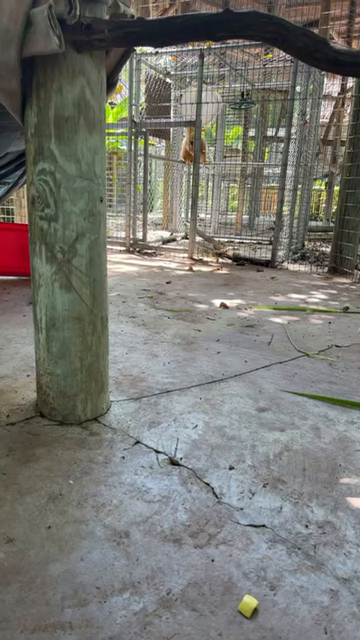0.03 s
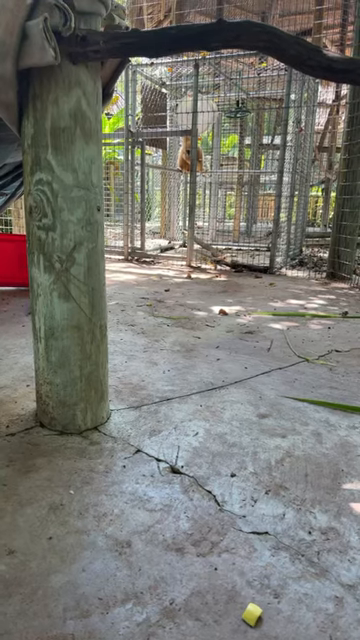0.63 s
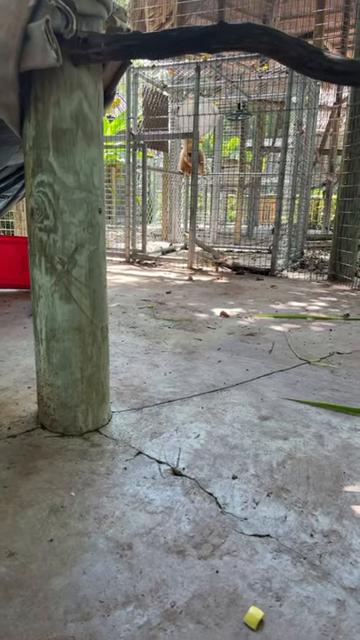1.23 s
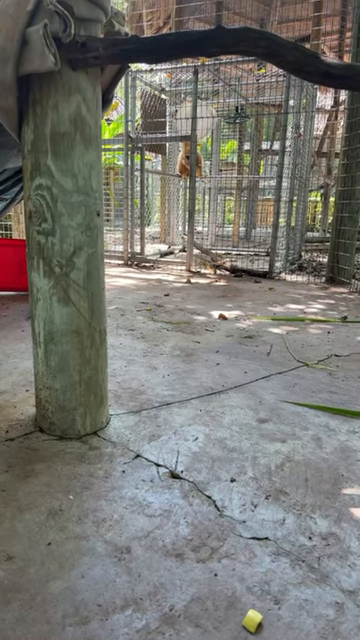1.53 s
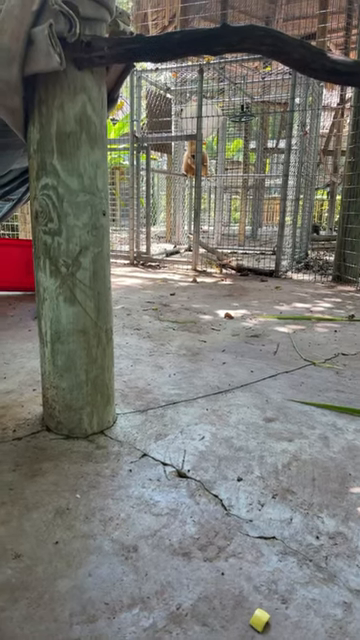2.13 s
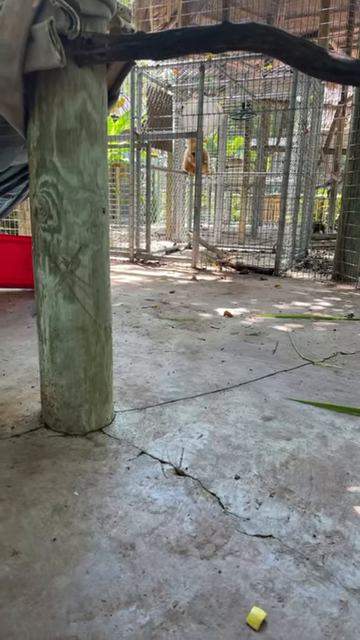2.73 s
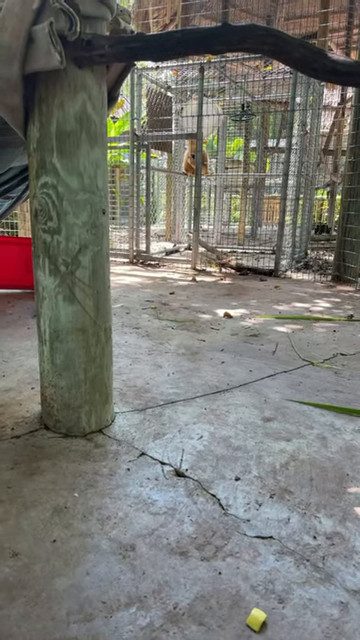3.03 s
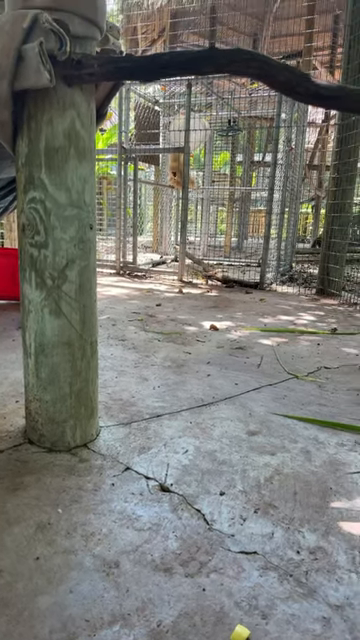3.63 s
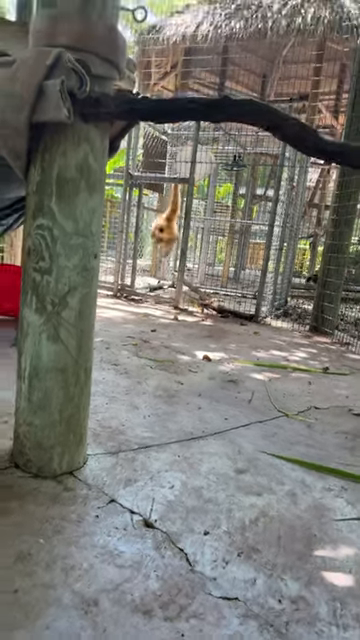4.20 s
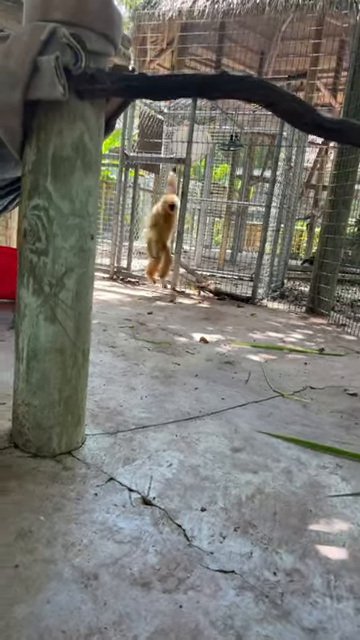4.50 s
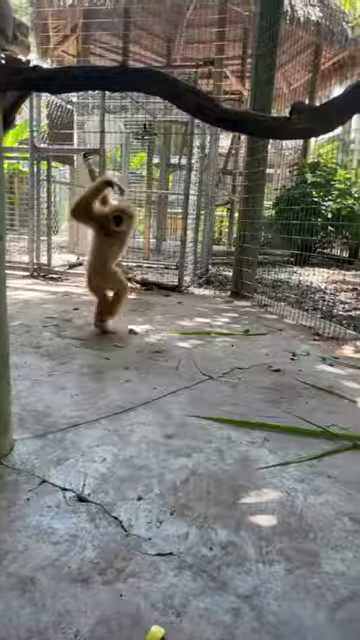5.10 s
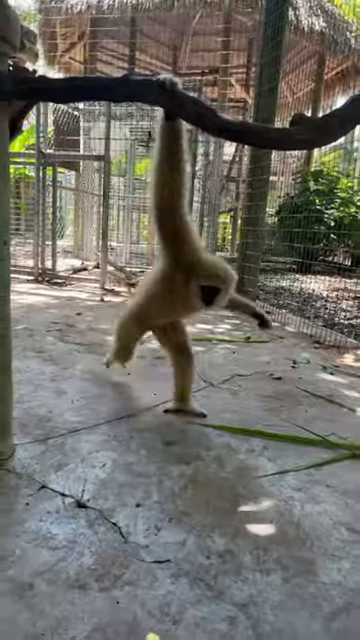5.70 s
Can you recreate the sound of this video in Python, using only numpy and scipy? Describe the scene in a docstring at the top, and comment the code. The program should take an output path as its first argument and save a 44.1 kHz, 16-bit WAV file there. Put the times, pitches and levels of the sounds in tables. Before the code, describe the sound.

A low outdoor rumble and steady hiss run throughout, growing slightly. A far bird gives a faint, falling, echoing whistle at the very start, near 1.9 seconds with a thin high chip, and again at 4.4. Small plops and light knocks dot the quiet, clearest at 0.4 and 3 seconds. From 3.4 a hand rubs the microphone, with a sharp snap at 3.6 and a cluster of close, dull bumps at 3.9. Between 4.1 and 4.7 a gibbon swings off a wire cage: the wires chatter and the frame rings, strongest at about 4.5. At 4.8 it lands on concrete and runs closer in quick, uneven steps, each a gritty slap with a low thud and dull thump. Fine grit crackles and snaps underfoot, getting louder, with a little yard echo. The sharpest footfall comes at about 5.7 seconds.

```python
"""A low outdoor rumble and steady hiss, with a far bird's falling whistle, light knocks and small plops.
A gibbon swings off a wire cage: the wires chatter and the frame rings. It drops to a concrete floor
and runs closer, each footfall a gritty slap, a thud and a thump, over a growing crackle of grit.
Just before the cage rattles, a hand rubs and bumps the camera it holds to follow the animal."""
import sys
import numpy as np
from scipy import signal
from scipy.fft import rfft
from scipy.io import wavfile
from scipy.ndimage import uniform_filter1d

SR = 44100
rng = np.random.default_rng(int(sys.argv[2]) if len(sys.argv) > 2 else 0)


def digitize_waveform(pressure):
    """Quantize a signal to 16-bit integers and store it at the path in sys.argv[1].

    Rows of a 2-D input are taken as channels; values are limited to [-1, 1].
    """
    field = np.atleast_2d(pressure).T
    bounded = np.clip(field, -1, 1)
    quanta = np.round(bounded * 32767).astype(np.int16)
    wavfile.write(sys.argv[1], SR, quanta)


N = 253575
TIME = np.arange(N) / SR


def amp(db):
    """Decibels to gain."""
    return 10 ** (np.asarray(db) / 20)


def unit_rms(x):
    """Scales to rms 1."""
    return x / np.sqrt(np.mean(x ** 2) + 1e-20)


def at_hz(points, hz):
    """Interpolates (f/Hz, value) points on a log-frequency axis."""
    f, value = np.transpose(points)
    return np.interp(np.log(hz + 1), np.log(f + 1), value)


def add(mix, start_s, sound):
    """Mixes a sound in at start_s."""
    at = round(start_s * SR)
    sound = sound[max(-at, 0):]
    part = mix[max(at, 0):][:len(sound)]
    part += sound[:len(part)]


def colour(x, db_at):
    """Filters by a rule Hz -> dB; rms 1."""
    hz = np.fft.rfftfreq(len(x), 1 / SR) + 1
    return unit_rms(np.fft.irfft(rfft(x) * amp(db_at(hz)), len(x)))


def equalise(x, spectrum, tilt_db_oct=0):
    """Filters by a spectrum table and a tilt that levels off below 500 Hz; rms 1."""
    return colour(x, lambda hz: at_hz(spectrum, hz) + tilt_db_oct * np.log2(hz + 500))


def hump(x, centre_hz, width_oct):
    """Rounded band-pass with steep skirts; rms 1."""
    away = lambda hz: (np.log2(hz / centre_hz) / width_oct) ** 2
    return colour(x, lambda hz: -20 * np.log10(1 + away(hz) + (away(hz) / 4) ** 2))


def wander(size, *windows):
    """Noise smoothed by moving averages (lengths in samples); rms 1."""
    x = rng.standard_normal(size)
    for window in windows:
        x = uniform_filter1d(x, size=window)
    return unit_rms(x)


def grit(size, spread_db):
    """Noise of tiny contacts of unequal strength."""
    noise = rng.standard_normal(size)
    strength = rng.standard_normal(size // 16 + 1).clip(-2, 2)
    return noise * amp(spread_db * np.repeat(strength, 16)[:size])


def glide(hz):
    """Sine following a pitch curve."""
    return np.sin(2 * np.pi * np.cumsum(hz) / SR)


def fade(t, rise_s, t60_s):
    """Linear rise, exponential decay."""
    return np.minimum(t / max(rise_s, 1e-5), 1) * amp(-60 * np.maximum(t - rise_s, 0) / t60_s)


def shaped(noise, envelope):
    """Enveloped noise with the envelope's energy."""
    return unit_rms(noise[:len(envelope)] * envelope) * np.sqrt(np.mean(envelope ** 2))


def echoes(x, decay):
    """Scattered reflections dying per band; decay is (f/Hz, t60/s)."""
    taps = rng.standard_normal(SR) * (rng.random(SR) < .1) * (TIME[:SR] > .006)
    hz, t, bands = signal.stft(taps, SR, nperseg=256)
    tail = signal.istft(bands * amp(-60 * t / at_hz(decay, hz)[:, None]), SR, nperseg=256)[1]
    return signal.fftconvolve(x, tail / np.linalg.norm(tail))[:N]


def equal_echoes(x, decay):
    """Echoes at the length and rms of x."""
    return np.std(x) * unit_rms(echoes(x, decay)[:len(x)])


# outdoor noise spectra: f/Hz, relative density/dB
RUMBLE_SPECTRUM = [(20, -17), (36, -21), (54, 0), (70, -3), (105, -3.5), (140, -11), (200, -16.5),
                   (300, -24.5), (480, -35.5), (900, -69)]
DRONE_SPECTRUM = [(60, -31), (155, 2), (220, 1), (280, -7.5), (345, -5), (450, -21.5), (900, -54)]
HISS_SPECTRUM = [(250, -5.5), (450, -0.5), (700, -0.5), (1300, -0.5), (1800, -1.5), (2350, 0.5),
                 (2900, -4.5), (4400, -5), (5200, -2.5), (7500, -5), (9400, -20), (12000, -18),
                 (14000, -22.5), (16000, -43)]
# drone swell: t/s, level/dB
DRONE_LEVELS = [(.1, -56), (.7, -51.5), (1.35, -50.5), (2.3, -57), (4.8, -54.5), (5.3, -59)]
# far machinery: f/Hz, rms level/dB
MACHINE_TONES = [(57, -55), (2326, -80), (3714, -85.5)]


def background(rise_db_s=0.74, hiss_rise_db_s=0.76, waver_hz=2.55):
    """Rumble and hiss grow slowly, a low drone swells and ebbs, far machine tones waver."""
    noise = lambda spectrum: equalise(rng.standard_normal(N), spectrum)
    drift = lambda: wander(N, 4000, 2000)
    rumble = noise(RUMBLE_SPECTRUM) * amp(-47 + rise_db_s * TIME + 1.6 * drift())
    drone = noise(DRONE_SPECTRUM) * amp(np.interp(TIME, *np.transpose(DRONE_LEVELS)))
    hiss = noise(HISS_SPECTRUM) * amp(-60.5 + hiss_rise_db_s * TIME + 0.48 * drift())
    hum = sum(amp(db) * unit_rms(amp(3 * drift()) * glide(hz + waver_hz * drift()))
              for hz, db in MACHINE_TONES)
    return rumble + drone + hiss + hum


# calls: t/s, gain/dB
BIRD_CALLS = [(-.155, -65), (1.866, -61), (4.362, -61)]
# one whistle: t/s, f/Hz, relative level/dB
WHISTLE_CONTOUR = [(0, 3197, -6), (0.054, 3543, -6.5), (.11, 3375, -3), (.195, 3279, -3.5),
                   (.272, 3172, 0.5), (0.314, 2960, -2.5), (0.4, 2743, -10)]
# echo among trees: f/Hz, t60/s
TREE_DECAY = [(1000, 1.3), (6000, 0.74)]


def bird(direct_db=-13, echo_db=-.5, quaver_hz=75):
    """A far, quavering whistle flicks up, holds and sags, smeared by its echoes."""
    times, pitch_hz, db = np.transpose(WHISTLE_CONTOUR)
    t, out = TIME[:round(times[-1] * SR)], np.zeros(N)
    hz = np.interp(t, times, pitch_hz)
    envelope = amp(np.interp(t, times, db)) * signal.windows.tukey(len(t), .1)
    for start_s, gain_db in BIRD_CALLS:
        whistle = envelope * glide(hz + quaver_hz * wander(len(t), 120))
        call = np.pad(unit_rms(whistle), (0, SR))
        echo = equal_echoes(call, TREE_DECAY)  # moving air and leaves: new echoes per call
        add(out, start_s, amp(gain_db) * (amp(direct_db) * call + amp(echo_db) * echo))
    return out


# light knocks and ticks: t/s, level/dB, f/Hz
KNOCKS = [(.36, -56, 12000), (.379, -55, 1500), (.42, -55, 1300), (3.463, -51, 1700), (4.049, -45, 1230),
          (4.451, -48, 950), (5.127, -50, 1300), (5.182, -50.5, 1180), (5.197, -51, 955), (5.358, -53, 400),
          (5.404, -49, 2260), (5.659, -46, 1000), (5.67, -49, 1300)]


def knocks(t60_1khz_s=0.026, width_oct=0.42):
    """Light contacts with one heavily damped resonance; higher ones die sooner."""
    t, out = TIME[:SR // 5], np.zeros(N)
    for start_s, db, hz in KNOCKS:
        t60_s = t60_1khz_s * (1000 / hz) ** 0.58
        resonance = hump(grit(len(t), spread_db=0), hz, width_oct)
        add(out, start_s, amp(db) * shaped(resonance, fade(t, 0.00084, t60_s)))
    return out


# yard echo off roof, posts and floor: f/Hz, t60/s
YARD_DECAY = [(100, 0.3), (1000, 0.7), (4000, 0.26), (14000, 0.068)]
# plops and pips: t/s, level/dB, first f/Hz, last f/Hz, glide/s, rise/s, t60/s, relative echo/dB
PLOPS = [(0.3789, -39.5, 2340, 373, 0.0014, 0.0056, 0.022, -8),
         (.3915, -44, 1510, 340, 0.0017, 0.0028, 0.028, -6),
         (.91, -53.5, 1500, 400, 0.0013, 0.0025, .018, -6),
         (1.136, -54, 1410, 450, 0.0022, 0.0033, .018, 2), (1.305, -59, 3920, 3500, .008, .008, .05, -8),
         (2.985, -40.5, 1170, 1550, 0.0028, 0.0026, 0.036, -3.5),
         (3.4836, -43.5, 350, 2910, 0.0039, 0.0024, 0.017, -4),
         (3.4888, -42, 2800, 497, 0.00114, .001, 0.025, -0.5),
         (4.1482, -40.5, 4730, 2370, 0.0012, 0.0011, 0.013, -9),
         (5.2946, -36.5, 4450, 2180, 0.00091, 0.0013, 0.017, -7)]


def plops():
    """Short tones slide quickly to their final pitch; the farther ones ring on in the yard."""
    t, out = TIME[:SR // 2], np.zeros(N)
    for start_s, db, first_hz, last_hz, glide_s, rise_s, t60_s, echo_db in PLOPS:
        hz = last_hz + (first_hz - last_hz) * np.exp(-t / glide_s)
        plop = amp(db) * fade(t, rise_s, t60_s) * glide(hz)
        add(out, start_s, plop + amp(echo_db) * equal_echoes(plop, YARD_DECAY))
    return out


# chip resonances: f/Hz, width/Hz, relative level/dB
CHIP_BANDS = [(5300, 600, 0.5), (7300, 2300, -1), (8950, 540, -2.5), (11700, 1000, -11), (14600, 1500, -15)]


def chip(start_s=1.925, length_s=0.093, level_db=-60):
    """One thin, hoarse, very high chip of five noise bands."""
    size, out = round(length_s * SR), np.zeros(N)
    bands = np.zeros(size)
    for hz, width_hz, db in CHIP_BANDS:
        response_db = lambda f: -20 * np.log10(1 + (2 * (f - hz) / width_hz) ** 2)
        bands += amp(db) * colour(rng.standard_normal(size), response_db)
    add(out, start_s, amp(level_db) * unit_rms(bands) * signal.windows.tukey(size, .4))
    return out


# soles on gritty concrete, also for feet(): f/Hz, relative density/dB
SOLE_SPECTRUM = [(200, -6), (480, -11), (800, 0), (1400, -14), (1900, 4), (2700, -6.5), (3800, -2.5),
                 (4600, -4.5), (5400, 3), (6500, -4), (8500, 4), (10000, -11.5), (12500, -1.5),
                 (16000, -15)]
# rustle contour: t/s, level before gain/dB
RUSTLE_LEVELS = [(3.2, -80), (3.4, -71), (3.53, -68.5), (4.14, -78), (4.35, -64), (4.53, -64), (4.68, -66),
                 (4.88, -68.5), (5.59, -65.5), (5.75, -56.5)]


def rustle(gain_db=2, onset_s=.25):
    """Grit crackles finely as the animal moves, louder as it nears."""
    times, db = np.transpose(RUSTLE_LEVELS)
    onset = np.clip((TIME - times[0]) / onset_s, 0, 1)
    crackle = equalise(grit(N, spread_db=4), SOLE_SPECTRUM)
    return crackle * onset * amp(gain_db + np.interp(TIME, times, db))


# hand rubs: t/s, length/s, scrape level/dB, scrape f/Hz, squeak level/dB
RUBS = [(3.439, 0.076, -55, 480, -68), (3.873, 0.089, -50.5, 700, -54.5), (3.8955, 0.0062, -49, 1500, -44),
        (3.902, 0.019, -47, 1210, -40.5), (3.925, 0.026, -43.5, 950, -61)]


def rubs(scrape_oct=1.5, squeak_hz=6200, squeak_oct=0.32):
    """Skin slides on the camera case with a low scrape and a high squeak."""
    out = np.zeros(N)
    for start_s, length_s, scrape_db, scrape_hz, squeak_db in RUBS:
        stroke = signal.windows.tukey(round(length_s * SR), .5)
        for db, hz, width_oct in (scrape_db, scrape_hz, scrape_oct), (squeak_db, squeak_hz, squeak_oct):
            friction = hump(grit(SR // 3, spread_db=3), hz, width_oct)
            add(out, start_s, amp(db) * shaped(friction, stroke))
    return out


# snaps: t/s, peak level/dB, centre f/Hz
SNAPS = [(3.4635, -46, 11000), (3.5683, -24.5, 2700), (4.35, -43, 11000), (4.412, -39, 13000),
         (4.431, -33, 13000), (4.474, -28, 6000), (4.785, -33, 5000), (4.825, -35, 12000),
         (5.2803, -29, 4200), (5.289, -27, 8000), (5.6655, -24, 5300), (5.6662, -21, 5030)]


def snaps(width_oct=1.0):
    """Grit, wire and the camera case snap, each a single sharp pulse."""
    out = np.zeros(N)
    for peak_s, db, hz in SNAPS:
        pulse = hump(signal.unit_impulse(256, "mid"), hz, width_oct)
        add(out, peak_s - len(pulse) / 2 / SR, amp(db) * pulse / pulse.max())
    return out


# bumps and thuds: t/s, level/dB, f/Hz, t60/cycles
BUMPS = [(3.585, -34.5, 67, 18), (3.894, -36, 1100, 6.5), (3.901, -27, 109, 3.9), (3.9192, -33, 620, 4),
         (3.922, -25.5, 159, 2.8), (3.9296, -34, 344, 14.6), (3.937, -23.5, 89.6, 10), (5.65, -39, 76, 18)]


def bumps(rise_cycles=0.29):
    """Low bumps and thuds ring for a few cycles: camera handling, and the last footfall's boom."""
    t, out = TIME[:SR // 3], np.zeros(N)
    for start_s, db, hz, t60_cycles in BUMPS:
        envelope = fade(t, rise_cycles / hz, t60_cycles / hz)
        add(out, start_s, amp(db) * envelope * np.sin(2 * np.pi * hz * t))
    return out


# cage shakes: t/s, level/dB, tilt/(dB/oct)
CAGE_SHAKES = [(4.109, -54.5, 4.5), (4.167, -54.5, -0.5), (4.454, -41, 1), (4.597, -53.5, 11)]
# wire chatter: f/Hz, relative density/dB
MESH_SPECTRUM = [(150, -2), (500, -3), (900, -3), (1800, -6), (3500, -5), (7500, -2), (10000, -13.5),
                 (13500, -11), (16000, -27)]
# frame bars: f/Hz, relative level/dB, rise/s, t60/s
FRAME_MODES = [(778, -3, .02, 0.58), (830, -6, 0.0092, 0.77), (920, -1.5, 0.005, 0.54),
               (1187, -4, .05, 0.55), (1370, -0.5, 0.079, 0.25), (1927, -8, 0.056, 0.41),
               (2500, -1.5, 0.034, 0.25), (3374, 6.5, .003, 0.083)]


def cage(clump_db=1.5, waver_rad=1.3):
    """Shaken wires chatter together in clumps; the frame's bars take up the motion and ring unevenly."""
    t, out = TIME[:SR], np.zeros(N)
    for start_s, db, tilt_db_oct in CAGE_SHAKES:
        clumps = amp(clump_db * wander(len(t), 180))
        wires = equalise(clumps * grit(len(t), spread_db=2), MESH_SPECTRUM, tilt_db_oct)
        chatter = shaped(wires, fade(t, rise_s=0.0045, t60_s=0.43))
        frame = np.zeros(len(t))
        for hz, mode_db, rise_s, t60_s in FRAME_MODES:
            phase = 2 * np.pi * hz * t + waver_rad * wander(len(t), 900, 500)
            frame += amp(mode_db) * fade(t, rise_s, t60_s) * np.sin(phase)
        ring_db = -5.5 - 1.4 * tilt_db_oct  # bright shakes move mostly the wires
        ring = amp(ring_db) * np.std(chatter) * unit_rms(frame)
        add(out, start_s, amp(db) * (chatter + ring))
    return out


# footfalls: t/s, slap level/dB, contact/s, thud level/dB, thump level/dB
FOOTFALLS = [(4.783, -43.5, 0.002, -47, -54.5), (4.824, -61, .0012, -39, -70),
             (4.871, -52, 0.0026, -60, -70), (5.121, -57, 0.0071, -32, -46), (5.221, -52, 0.015, -34, -47),
             (5.2795, -50, 0.0027, -52, -52), (5.345, -61, 0.0051, -51, -46.5),
             (5.379, -59, 0.0035, -53, -65), (5.462, -52.5, 0.00353, -60, -68),
             (5.664, -28.5, 0.00075, -35, -47), (5.694, -47.5, 0.0031, -32.5, -50)]


def feet(crisp_s=0.0033, tail_db=-19, thud_hz=110, thump_hz=290):
    """Each footfall lands on concrete as a gritty slap with a low thud, a dull thump and a soft tail."""
    t, out = TIME[:SR // 3], np.zeros(N)

    def skin(tilt_db_oct, rise_s, t60_s):
        """One gritty burst of sole contact."""
        noise = equalise(grit(len(t), spread_db=3), SOLE_SPECTRUM, tilt_db_oct)
        return shaped(noise, fade(t, rise_s, t60_s))

    for start_s, slap_db, contact_s, thud_db, thump_db in FOOTFALLS:
        dulling_db_oct = -7 * max(np.log2(contact_s / crisp_s), 0)  # slow contacts are duller
        slap = skin(dulling_db_oct, rise_s=contact_s, t60_s=30 * contact_s)
        tail = amp(tail_db) * skin(tilt_db_oct=-6, rise_s=0.013, t60_s=0.11)
        thud = fade(t, rise_s=0.0045, t60_s=0.072) * np.sin(2 * np.pi * thud_hz * t)
        dull_noise = hump(grit(len(t), spread_db=3), thump_hz, width_oct=0.45)
        thump = shaped(dull_noise, fade(t, rise_s=0.0051, t60_s=0.084))
        add(out, start_s, amp(slap_db) * (slap + tail) + amp(thud_db) * thud + amp(thump_db) * thump)
    return out


def scene(near_echo_db=-12, far_echo_db=-10):
    """Mono mix: near sounds carry a little yard echo, the far chip more; rubs and bumps stay dry."""
    near = feet() + knocks() + snaps() + cage()
    far = chip()
    yard = echoes(amp(near_echo_db) * near + amp(far_echo_db) * far, YARD_DECAY)
    return (near + far + yard + plops() + rustle() + rubs() + bumps() + bird() + background())[None]


def record(dry, silent_s=0.034, ramp_s=0.068, cutoff_hz=15950):
    """Fade-in, then low-pass."""
    faded = dry * np.clip((TIME - silent_s) / ramp_s, 0, 1)
    lowpass = signal.firwin(511, cutoff_hz, window=("kaiser", 9), fs=SR)
    return signal.oaconvolve(faded, lowpass[None], "same")


dry = scene()
out = record(dry)
digitize_waveform(out)
```